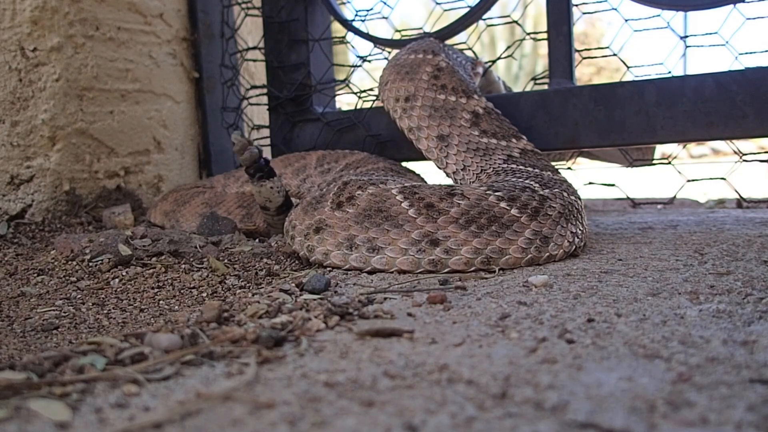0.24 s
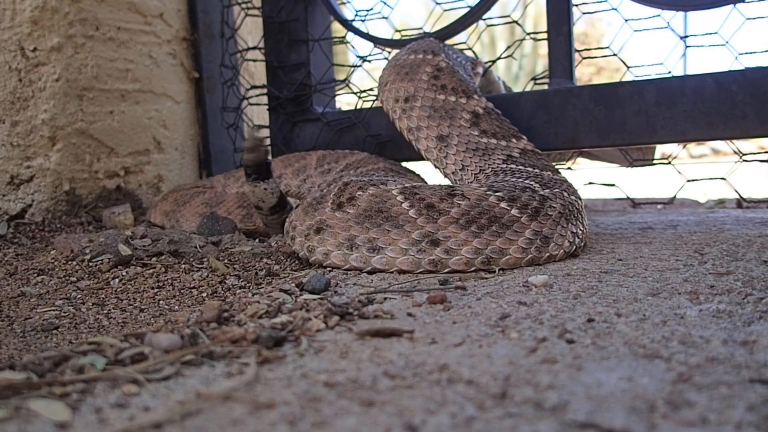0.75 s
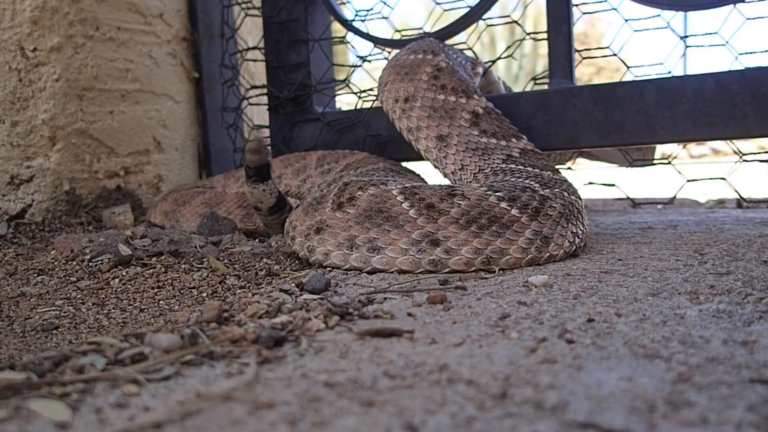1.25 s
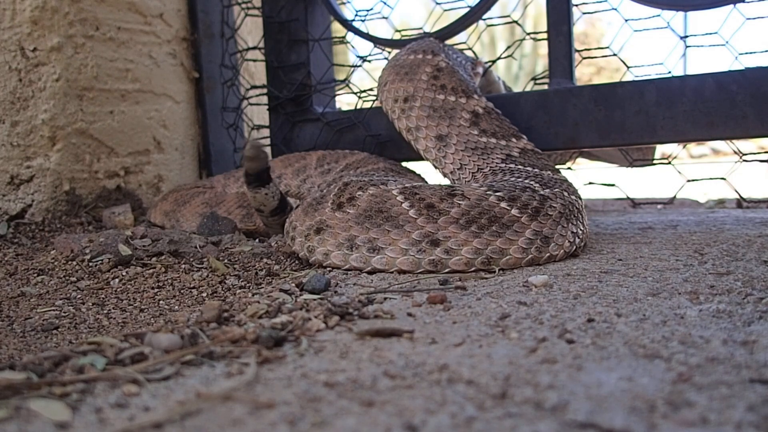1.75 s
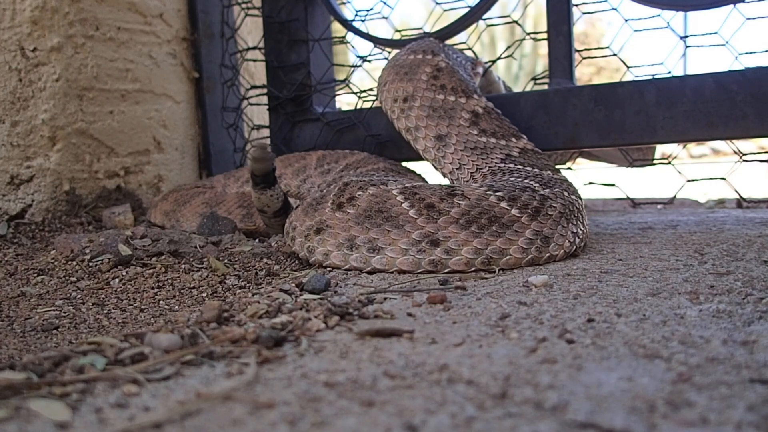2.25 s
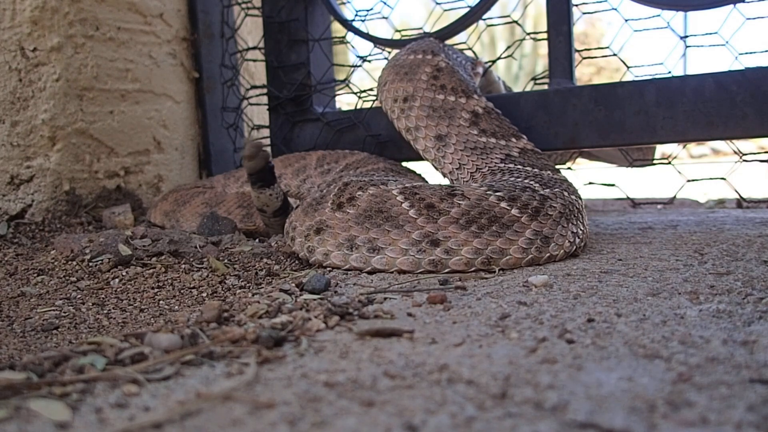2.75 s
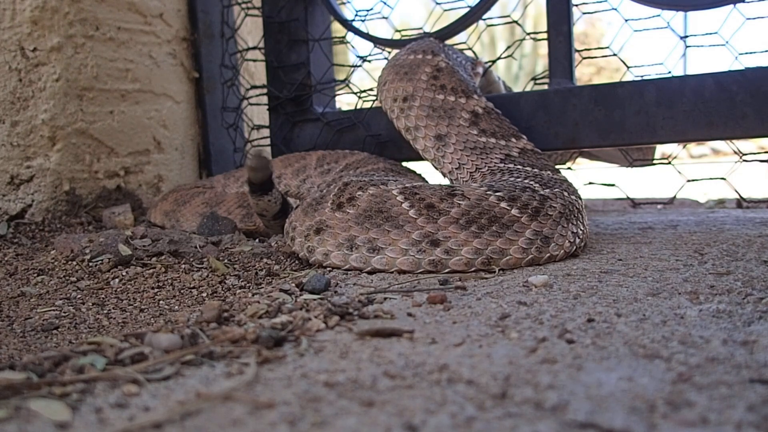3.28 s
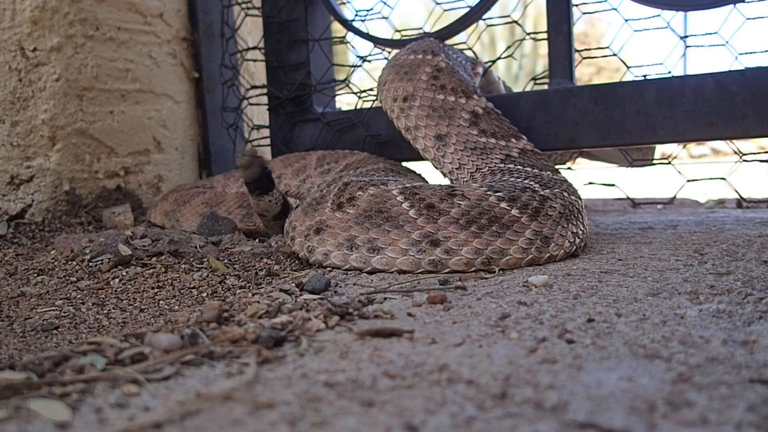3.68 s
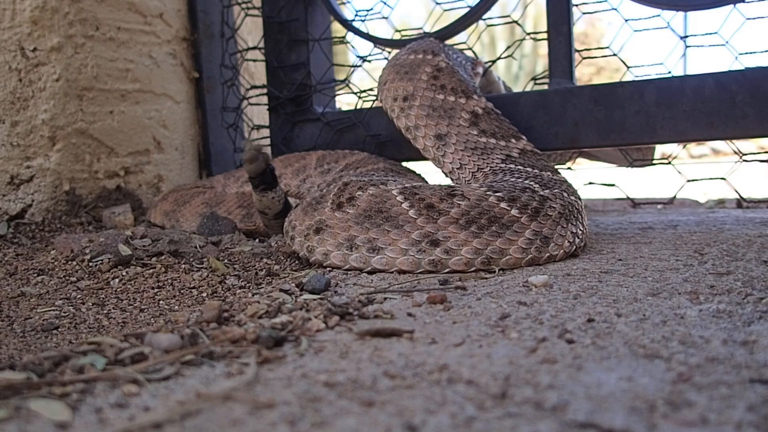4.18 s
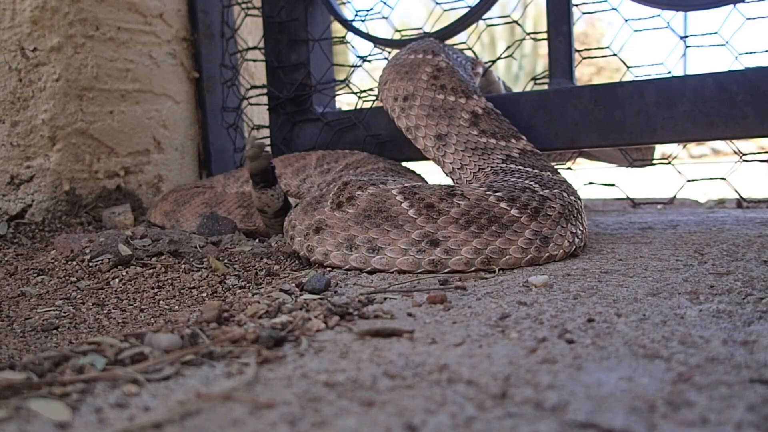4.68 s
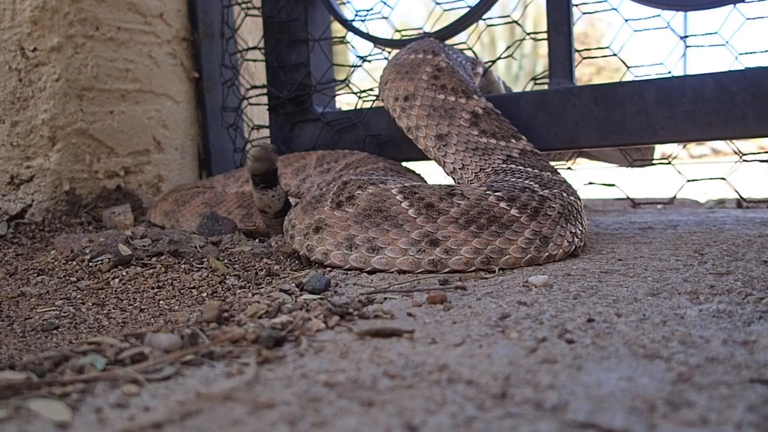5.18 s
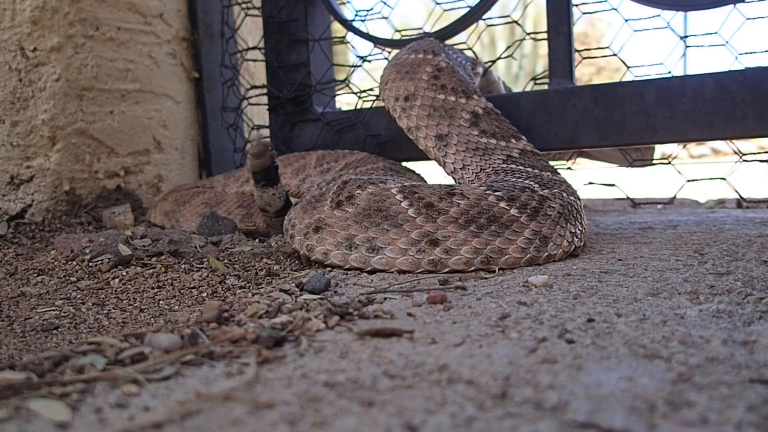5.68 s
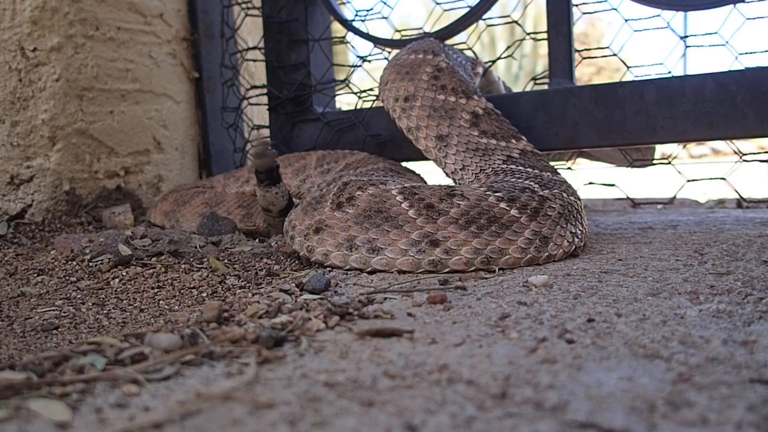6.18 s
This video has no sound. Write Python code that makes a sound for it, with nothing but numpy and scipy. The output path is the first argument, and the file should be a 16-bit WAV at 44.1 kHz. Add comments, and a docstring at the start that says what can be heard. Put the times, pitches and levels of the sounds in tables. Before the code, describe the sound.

From the first instant a rattlesnake's tail clacks close to the microphone in short, hard fits, each a rapid run of dry, hollow clicks lasting a few hundredths of a second, slowing slightly and ending in a weak tick. About nineteen fits pass by 1.35 seconds, becoming more closely spaced. From 1.4 seconds the shaking becomes a continuous, lower-level buzz of roughly 120 clacks a second, bright and brittle, swelling until about 1.9 and again near 3. Sharp single clacks stand out, and it stumbles around 2.5, 4.3 and 5.5 before continuing to the end at 6.4. Its tone thins slightly around 3.4. Wall and gravel give short, sizzling reflections. Underneath are steady air and hiss, a wavering distant machinery drone, and a low engine hum gone by about 3.2. A small hollow double knock sounds near 3.0, with fainter taps at 4.6 and 6.0.

```python
"""Rattlesnake by a wall

A coiled rattlesnake shakes its tail beside a wall and an iron gate, close to a small microphone on the ground.
Short fits lead to a held buzz that stumbles now and then; blows ring the hollow horn segments twice a swing.
Wall and gravel return filtered noise echoes. Behind, shaped noise makes air hiss and a far machinery drone,
two sines an engine hum that fades, and damped modes a small double knock with two fainter ones later."""
import sys
import numpy as np
from scipy import signal
from scipy.fft import rfft, irfft, next_fast_len
from scipy.io import wavfile
from scipy.ndimage import uniform_filter1d

SR = 44100
rng = np.random.default_rng(int(sys.argv[2]) if len(sys.argv) > 2 else 0)


def output_pcm(signal):
    """Save a mono or channel-first signal as 16-bit PCM at the path in sys.argv[1].

    Samples are clipped to [-1, 1] before scaling.
    """
    pcm = np.clip(np.atleast_2d(signal).T, -1, 1) * 32767
    wavfile.write(sys.argv[1], SR, np.round(pcm).astype(np.int16))


def gain_from_db(level_db):
    """Convert decibel levels to linear amplitude factors (20 dB per decade)."""
    decades = np.asarray(level_db, float) / 20
    return 10 ** decades


N = 283563
TIME = np.arange(N) / SR

# opening fits of shaking: (first clack [s], closing clack [s], trailing tick [s], level [dB],
# first clack relative to that level [dB])
FIT_ROWS = [(-0.02, .0062, .0167, -15, -4), (.0585, .0927, .1112, -12, -8), (.1381, .1767, .1942, -14, 0),
            (.221, .2446, .2632, -13, -2), (.314, .3427, .3642, -11, -8), (.4101, .4432, .4578, -14, -6),
            (.508, .5402, .5547, -13, -5), (.6, .6323, .66, -14, 0), (.6846, .7095, .7289, -10, -5),
            (.7586, .783, .7961, -15, 0), (.8347, .8613, .874, -13, 0), (.8925, .9143, .9292, -14, -4),
            (.9571, .9773, .9897, -12, -5), (1.0094, 1.0398, 1.0528, -15, -5),
            (1.0805, 1.1043, 1.1176, -14, -2), (1.141, 1.1644, 1.1767, -13, 0),
            (1.198, 1.227, 1.2394, -14, -8), (1.2628, 1.289, 1.303, -14, -6),
            (1.3292, 1.353, 1.3664, -14, -2)]


def evened(x):
    """Scales to rms 1."""
    return x / np.sqrt(np.mean(x ** 2) + 1e-20)


def read(points, hz):
    """Reads a spectrum on a log frequency axis."""
    f, value = np.transpose(points)
    return np.interp(np.log(hz + 1), np.log(f + 1), value)


def column(rows, index):
    """One curve of a table at every sample."""
    rows = np.array(rows)
    return np.interp(TIME, rows[:, 0], rows[:, index])


def coloured(x, response):
    """Applies a frequency response given as a function of Hz."""
    size = next_fast_len(N + 2048)
    spectrum = rfft(x, size) * response(np.fft.rfftfreq(size, 1 / SR))
    return irfft(spectrum, size)[..., :N]


def resonate(x, hz, width):
    """A resonance of gain 1: shifted down to 0 Hz, smoothed by one pole and shifted back."""
    turn = np.exp(2j * np.pi * hz * TIME)
    r = np.exp(-np.pi * width / SR)
    return 2 * (turn * signal.lfilter([1 - r], [1, -r], x / turn)).real


def drift(seconds):
    """Smoothed random wandering of rms 1."""
    span = round(seconds * SR)
    once = uniform_filter1d(rng.standard_normal(N), span)
    return evened(uniform_filter1d(once, span))


def causal(gain):
    """Minimum-phase impulse response of a gain given on half the circle."""
    log_gain = np.log(np.r_[gain, gain[-2:0:-1]] + 1e-5)
    return np.fft.ifft(np.exp(np.conj(signal.hilbert(log_gain)))).real[:1024]


def scatter(train, t60):
    """Fresh noise after every blow, dying away with the blow's own energy: sound from many small paths."""
    r = np.exp(-2 * np.log(1000) / (t60 * SR))
    energy = signal.lfilter([0, 1 - r], [1, -r], train ** 2)
    return np.sqrt(energy) * rng.standard_normal(N)


def shaking():
    """Strength of the shake: chatter through each fit, then the held buzz with its stumbles."""
    # effort of the held buzz: (time [s], relative level [dB])
    effort = [(1.376, -36.5), (1.44, -32), (1.55, -28.5), (1.9, -27.5), (2.1, -28), (2.5, -29.5),
              (2.97, -27.5), (3.4, -28.5), (3.75, -28.5), (4.2, -29), (4.7, -29.5), (5.3, -29), (5.7, -30),
              (6.0, -29.5), (6.43, -31)]
    # moments where the tail misses its beat: (time [s], length [s], change of level [dB])
    stumbles = [(2.2, 0.01, -5), (2.529, 0.034, -5), (2.575, 0.024, -5), (2.629, 0.0085, -4),
                (2.803, .023, -1), (2.844, 0.024, -1.5), (3.667, 0.011, -7), (3.806, 0.028, -1),
                (4.186, 0.02, -5), (4.242, 0.018, -11), (4.305, 0.028, -17), (4.36, 0.019, -3),
                (4.741, 0.028, -2), (4.836, 0.025, -3.5), (5.082, 0.023, -2.5), (5.237, 0.019, -2.5),
                (5.479, 0.031, -5.5), (5.559, .012, -4), (5.606, 0.019, -4), (5.679, .014, -3),
                (5.841, 0.019, -3), (5.963, 0.023, -3.5), (6.312, 0.019, 0), (6.367, 0.025, -5.5)]
    wobble_db, wobble_s = 0.9, 0.02  # the effort is never quite even
    catch_up, catch_up_s = 0.27, 0.01  # share of the dip won back as a surge, and the surge's decay
    chatter_db = -20  # loose segments during a fit, relative to its level
    left_db, settle_s = -11.5, 0.06  # chatter that lingers after the fit, and its decay

    db = column(effort, 1) + wobble_db * drift(wobble_s)
    for s, length, depth_db in stumbles:
        after = TIME - s - length / 2
        dip = np.exp(-((TIME - s) / (length / 2)) ** 4)
        surge = catch_up * (after > 0) * np.exp(-after.clip(0) / catch_up_s)
        db = db + depth_db * (dip - surge)
    strength = gain_from_db(db) * (TIME > effort[0][0])

    for s, end, _, level_db, _ in FIT_ROWS:
        t = (TIME - s).clip(0)
        held = np.exp(-(t / (end - s)) ** 4)
        lingering = gain_from_db(left_db) * np.exp(-t / settle_s)
        strength = strength + gain_from_db(level_db + chatter_db) * (t > 0) * np.maximum(held, lingering)
    return strength


def blows():
    """Impact train: one clack at each end of the swing, and loose segments chattering after it."""
    # pace of the held buzz: (time [s], clacks per second [1/s]); the tail swings at half of it
    pace_rows = [(1.45, 130), (1.7, 134), (2.0, 124), (2.45, 120), (2.75, 114), (3.0, 128), (3.3, 136),
                 (3.6, 114.5), (3.9, 120.4), (4.5, 117.5), (5.2, 121), (5.6, 125), (6.43, 122)]
    fit_pace = 150  # clacks per second before the table begins
    jitter, spread_db = 0.09, 0.5  # random lateness as a share of the gap, and random level
    loose_per_s, loose_db, bunch = 550, -8.5, 1.8  # bunch: how closely the chatter follows the turn

    pace = np.where(TIME > pace_rows[0][0], column(pace_rows, 1), fit_pace)
    turns = np.cumsum(pace) / SR
    ends = np.flatnonzero(np.diff(np.floor(turns)))
    late, size = rng.standard_normal((2, len(ends)))
    at = (ends + jitter * late * SR / pace[ends]).astype(int).clip(0, N - 1)
    train = np.zeros(N)
    train[at] = gain_from_db(spread_db * size)

    chatter = loose_per_s * bunch * np.exp(-bunch * (turns % 1))  # densest just after the turn
    struck = rng.random(N) < chatter / SR
    return train + struck * gain_from_db(loose_db + 1.47 * np.minimum(rng.exponential(1, N), 4))


def clacks():
    """Times and levels of distinct clacks: each fit's run, gaps widening as the swing tires, then hard ones."""
    # hardest single clacks of the held buzz: (time [s], relative level [dB])
    hard = [(1.3893, -16), (1.4771, -13), (1.6966, -12), (1.9126, -13), (2.0902, -16), (2.1396, -14),
            (2.2219, -15), (2.2888, -16), (2.4778, -14), (2.5462, -15), (2.6494, -13), (2.7013, -15),
            (2.8161, -15), (3.8767, -13), (4.0557, -14), (4.2633, -16), (4.3177, -16), (4.4209, -15),
            (4.6359, -11), (4.7527, -13), (4.806, -17), (4.8569, -17), (5.1607, -16), (5.254, -15),
            (5.5254, -17), (5.5638, -15), (5.7145, -13), (5.7479, -15), (5.8312, -13), (5.9021, -16),
            (5.9814, -15), (6.0552, -15), (6.0891, -14), (6.2353, -13), (6.3306, -14), (6.3904, -15)]
    gap_s, slowing = 0.008, 1.2  # mean gap in a fit; an exponent above 1 widens the gaps
    tire_db, tick_db = -3.0, -11.0  # closing clack and trailing tick relative to the fit's level
    uneven_db, uneven_s = 1.8, 0.001  # random level and timing

    rows = []
    chance = rng.standard_normal((len(FIT_ROWS), 2, 8))
    for (s, end, tick, level_db, first_db), (late, size) in zip(FIT_ROWS, chance):
        u = np.linspace(0, 1, round((end - s) / gap_s) + 1)
        inner = (u > 0) * (u < 1)
        at = s + (end - s) * u ** slowing + uneven_s * late[:len(u)] * inner
        tired = tire_db * u ** 2 - 2 * uneven_db * np.abs(size[:len(u)])
        db = level_db + np.where(u > 0, tired, first_db)
        rows += [*zip(at, db), (tick, level_db + tick_db + uneven_db * size[-1])]
    return [row for row in rows if row[0] > 0] + hard


def horn():
    """Impulse response of the hollow segments: their modes over the dull impact, energy 1."""
    # modes of the hollow segments: (frequency [Hz], width at half amplitude [Hz], relative level [dB])
    mode_rows = [(2230, 570, -25.5), (3160, 390, -15.5), (3650, 400, -18.5), (4510, 410, -12.0),
                 (4660, 130, -13.5), (5040, 390, -6.0), (5440, 600, -9.5), (5820, 160, -10.5),
                 (5980, 370, -8.0), (6400, 360, -11.5), (6870, 320, -14.0), (7290, 330, -8.0),
                 (7740, 420, -2.0), (8030, 350, -1.0), (8230, 170, -4.5), (8660, 580, -9.5),
                 (8970, 100, -15.5), (9380, 590, -11.5), (10170, 580, -18.5), (11000, 800, -15.0),
                 (12250, 1500, -21.0), (13060, 1500, -14.5), (14360, 1370, -17.0), (15460, 610, -20.0)]
    # dull body of the impact: (frequency [Hz], relative level [dB])
    crack = [(300, -39), (800, -24), (1300, -22), (1700, -28), (2600, -50), (16500, -25)]
    # path from tail to microphone: (frequency [Hz], gain on the modes [dB])
    tilt = [(2000, 1), (3500, 0), (5500, 0.5), (8000, 1.28), (11000, 1.3), (15000, 0.8)]
    hz = np.fft.rfftfreq(4096, 1 / SR)
    modes = sum(gain_from_db(db) ** 2 / (1 + (2 * (hz - f) / w) ** 2) ** 2 for f, w, db in mode_rows)
    body = causal(np.sqrt(modes * gain_from_db(read(tilt, hz)) ** 2 + gain_from_db(read(crack, hz)) ** 2))
    return body / np.linalg.norm(body)


def bounced(x):
    """Repeating all-pass echoes that spread a snap in time and leave its colour alone."""
    # quick bounce between ground and coils: (delay [samples], strength [0-1])
    bounce_rows = [(14, .7)]
    for delay, strength in bounce_rows:
        loop = np.r_[1, np.zeros(delay - 1), -strength]
        x = signal.lfilter(loop[::-1], loop, x)
    return x


def rattle():
    """Running train and hard clacks strike the segments; returns sound, its sideways part and the blows."""
    # lean of the tail away from the microphone: (time [s], lean [0 = upright])
    pose = [(0, -0.25), (1.2, -0.66), (1.9, 0.15), (2.8, -0.11), (3.4, 1.), (4.2, 0.41), (4.7, -0.015),
            (6.43, -0.23)]
    main_db, middle_db, low_db = -6.5, 0.5, 1  # change of each group of modes at lean 1
    buzz_db, hard_db = -2.5, 1.0  # trims of the running train and the distinct clacks
    duck_s = 0.003  # ordinary blows softened ahead of a distinct clack, and half as long after
    bright_spread_db, colour_db = 2.0, 2.5  # random spread from blow to blow
    wall_ms, wall_db = 2.3, -8.5
    echo_db, treble_echo_db, apart_db = -5.0, -6.5, -17.0

    train = evened(blows()) * shaking() * gain_from_db(buzz_db)
    bright = gain_from_db(bright_spread_db * rng.standard_normal(N))  # glancing blows are thinner and brighter
    hollow = colour_db * rng.standard_normal(N)  # each blow favours the main ring or the middle modes
    body = horn()
    for s, db in clacks():
        at = max(round(s * SR) - 6, 0)
        reach = round(duck_s * SR)
        train[max(at - reach, 0):at + reach // 2] *= 0.3  # it takes the place of the ordinary ones
        train[at] = gain_from_db(db + hard_db) / np.abs(body).max()

    def snap(v):
        return v * rng.choice([-1., 1.], N)

    def strike(v, t60, db=echo_db):
        """Snap, wall echo and scatter off gravel."""
        wall = gain_from_db(wall_db) * np.roll(snap(v), round(wall_ms * SR / 1000))
        return snap(v) + wall + gain_from_db(db) * scatter(v, t60)

    def above(hz, edge_hz):
        return 1 / (1 + (edge_hz / (hz + 1)) ** 16)

    def band(v, from_hz, to_hz):
        return coloured(v, lambda hz: np.sqrt(above(hz, from_hz) * (1 - above(hz, to_hz))))

    lean = column(pose, 1)
    low = strike(train * gain_from_db(low_db * lean), 0.022)
    low = coloured(low, lambda hz: np.sqrt(1 - above(hz, 3900)))
    middle = band(strike(train * gain_from_db(middle_db * lean - hollow), 0.022), 4290, 6120)
    main = band(strike(train * gain_from_db(main_db * lean + hollow), 0.018), 6790, 9100)
    treble = strike(train * bright, 0.0056, treble_echo_db)
    treble = coloured(treble, lambda hz: np.sqrt(above(hz, 9250)))
    sideways = gain_from_db(apart_db) * scatter(train, 0.012)  # echoes off wall and gate, opposite on the two ports
    both = np.array([bounced(low + middle + main + treble), sideways])
    near, sideways = signal.oaconvolve(both, body[None], axes=1)[:, :N]
    return near, sideways, train


def corner(near, sideways, train):
    """The near sound reaches both ports; the wall corner adds a diffuse ring, different on each side."""
    # colour of the wall corner's ring: (frequency [Hz], gain [dB])
    ring_colour = [(2000, -13), (4000, 3), (5300, 2), (6600, 4.5), (8000, 1), (15000, -6)]
    # near sound at the ports: (frequency [Hz], left minus right level [dB])
    balance = [(300, 3), (2700, -3.5), (4200, -12.5), (6400, 4), (9800, 2), (15000, 1.5)]
    # near sound at the ports: (frequency [Hz], phase by which left leads [rad])
    lead = [(0, 0), (4390, -0.0), (5250, 0.6), (6460, -0.3), (6980, 1.3), (7490, -0.2), (7920, 0.7),
            (8350, -0.0), (10100, 0.5), (10300, 0.3), (10600, 0.8), (11300, -0.1), (12100, 0.2),
            (16100, 0.0)]
    ring_db, ring_t60 = -3.5, 0.085  # t60 in seconds
    side = np.array([[.5], [-.5]])
    ports = coloured(near, lambda hz: gain_from_db(side * read(balance, hz)) * np.exp(1j * side * read(lead, hz)))
    late = np.r_[np.zeros(90), train][:N]  # the ring sets in 90 samples after the blow
    ring = np.array([scatter(late, ring_t60), scatter(late, ring_t60)])
    ring = coloured(ring, lambda hz: gain_from_db(read(ring_colour, hz)))
    ring = signal.oaconvolve(ring, horn()[None], axes=1)[:, :N]
    return ports + 2 * side * sideways + gain_from_db(ring_db) * ring


def stereo_noise():
    """White noise whose two sides agree by frequency."""
    # likeness of left and right: (frequency [Hz], correlation [0-1])
    same = [(30, 1), (210, 0.88), (500, 0.87), (1200, 0.45), (2000, 0.45), (16000, 0.39)]
    a, b = rng.standard_normal((2, N))
    mid = coloured(a, lambda hz: np.sqrt((1 + read(same, hz)) / 2))
    side = coloured(b, lambda hz: np.sqrt((1 - read(same, hz)) / 2))
    return np.array([mid + side, mid - side])


def air():
    """Steady outdoor wash and microphone hiss: noise shaped by frequency."""
    # colour of the wash and hiss: (frequency [Hz], relative level [dB])
    wash = [(25, -32), (45, -14), (65, -4.5), (200, -6), (480, -9), (1000, -14.5), (1500, -16), (2500, -22),
            (4100, -22), (5300, -7), (6400, -16), (8000, -31.5), (11000, -34), (16000, -31.5)]
    rms_db = -45.5
    return gain_from_db(rms_db) * evened(coloured(stereo_noise(), lambda hz: gain_from_db(read(wash, hz))))


def drone():
    """Noise through the far machinery's resonances, low and upper groups swelling apart."""
    # resonant bands of far machinery: (frequency [Hz], width of each of two passes [Hz], gain [dB])
    bands = [(108, 66, 0), (333.4, 49, -3.5), (403.7, 14.5, -3)]
    # low band, drawing away: (time [s], level about which it swells [dB])
    low_level = [(0, -52), (2.5, -49.5), (4.5, -52), (5.2, -56), (6.43, -55)]
    # upper bands: (time [s], level about which they swell [dB])
    upper_level = [(0, -50), (1, -56.5), (2.3, -50.5), (3.8, -56.5), (4.6, -51), (5.5, -52.5), (6.43, -52)]
    split_hz, swell_db, swell_s = 230, 2.5, 0.05  # both groups swell at random
    noise = stereo_noise()

    def group(rows):
        return evened(sum(gain_from_db(db) * resonate(resonate(noise, hz, w), hz, w) for hz, w, db in rows))

    low = group([row for row in bands if row[0] < split_hz])
    upper = group([row for row in bands if row[0] >= split_hz])
    low = gain_from_db(column(low_level, 1) + swell_db * drift(swell_s)) * low
    upper = gain_from_db(column(upper_level, 1) + swell_db * drift(swell_s)) * upper
    return low + upper


def hum():
    """First and third orders of a far engine: two sines locked to its turning."""
    # engine: (time [s], third order [Hz], third order rms level [dB], first order rms level [dB])
    orders = [(0, 134, -55, -54), (.8, 134, -55.5, -56), (1.6, 135, -60, -56), (2.4, 136, -52.5, -60),
              (3.2, 136, -71, -51)]
    turns = np.cumsum(column(orders, 1)) / SR / 3
    fade = np.clip((orders[-1][0] - TIME) / 0.4, 0, 1)  # silent from the last row on
    third = gain_from_db(column(orders, 2)) * np.sin(6 * np.pi * turns)
    first = gain_from_db(column(orders, 3)) * np.sin(2 * np.pi * turns)
    return np.sqrt(2) * fade * (third + first)


def knocks():
    """Soft hollow taps: a short rise, a damped mode and two weaker ones above it."""
    # small knocks: (time [s], level before rise and decay [dB], lowest mode [Hz], t60 [s])
    taps = [(2.959, -20, 975, 0.026), (3.0, -23.5, 950, 0.02), (4.569, -33.5, 578, 0.039),
            (6.005, -29, 568.8, 0.033)]
    out = np.zeros(N)
    for s, db, hz, t60 in taps:
        t = (TIME - s).clip(0)
        modes = np.sin(2 * np.pi * hz * t)
        modes += 0.52 * np.sin(2 * np.pi * 1.29 * hz * t)
        modes += 0.3 * np.sin(2 * np.pi * 1.85 * hz * t)
        out += gain_from_db(db - 60 * t / t60) * (1 - np.exp(-t / 0.0036)) * modes
    return out


def scene():
    """All sources at the microphone."""
    return corner(*rattle()) + air() + drone() + hum() + knocks()


def top_cut(x):
    """Nothing passes above the cut-off."""
    return signal.sosfilt(signal.butter(12, 16520, fs=SR, output="sos"), x)


def record(dry):
    """Housing notches, stereo width by frequency (nearly mono from 1.5 to 4.2 kHz, wider above), band edge."""
    # microphone housing: (frequency [Hz], width [Hz], depth [0-1])
    notches = [(1890, 90, .8), (4830, 70, .75)]
    # side level by frequency: (frequency [Hz], gain [dB])
    side_level = [(60, 3), (1000, -3.8), (1500, -10), (1900, -13), (3000, -12.5), (4100, -19), (4400, -5),
                  (8200, -3), (8600, -12), (11000, 4.5), (11500, -4), (16000, 1.5)]
    edge_hz = 15870  # middle of a 250 Hz slope down to -70 dB
    for hz, width, depth in notches:
        dry = dry - depth * resonate(dry, hz, width)
    mid = dry.mean(0)
    side = coloured((dry[0] - dry[1]) / 2, lambda hz: gain_from_db(read(side_level, hz)))
    stereo = np.array([mid + side, mid - side])
    mix = coloured(stereo, lambda hz: gain_from_db(-70 * np.clip((hz - edge_hz) / 250 + .5, 0, 1)))
    return top_cut(mix)


dry = scene()
out = record(dry)
output_pcm(out)
```